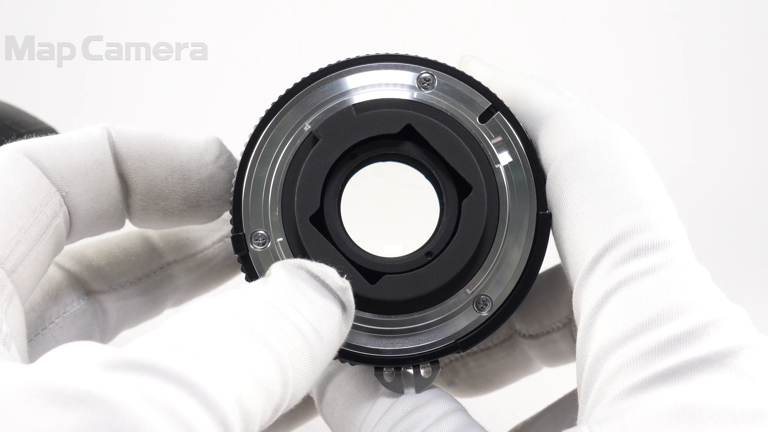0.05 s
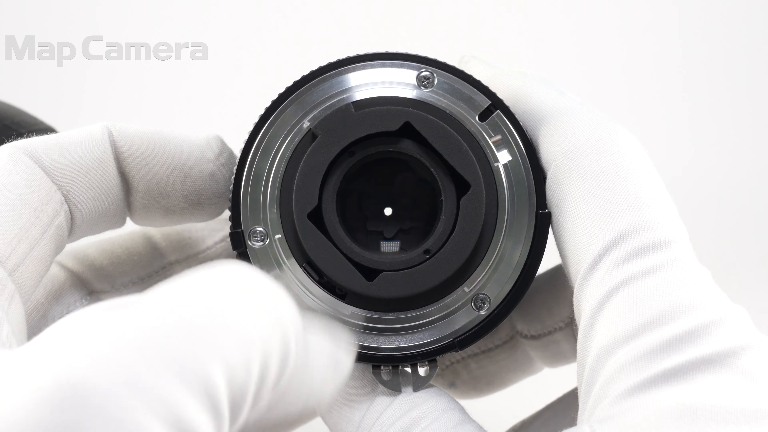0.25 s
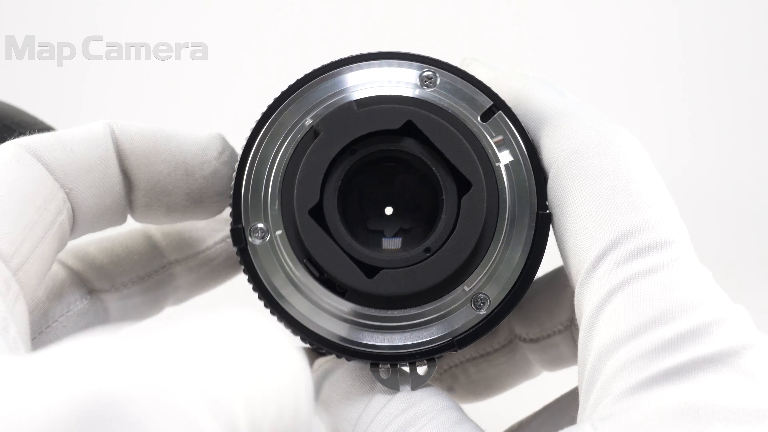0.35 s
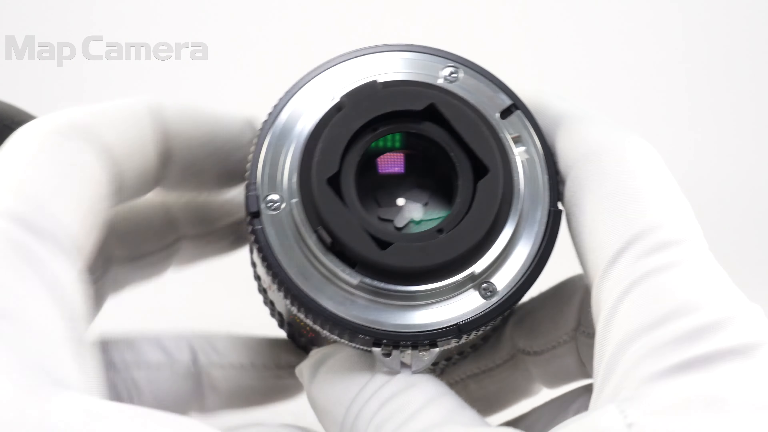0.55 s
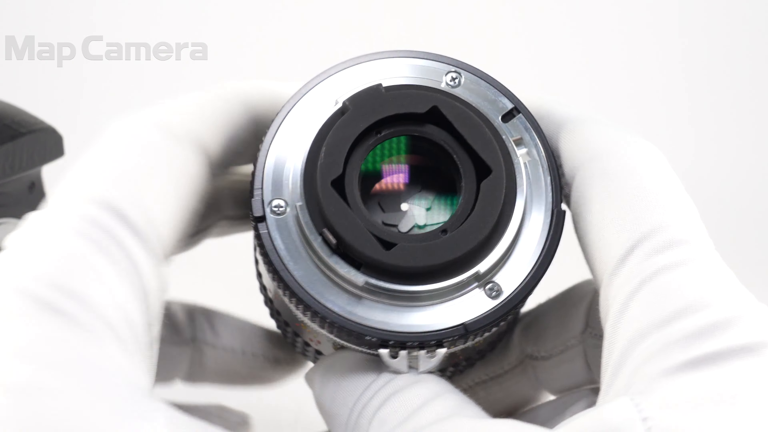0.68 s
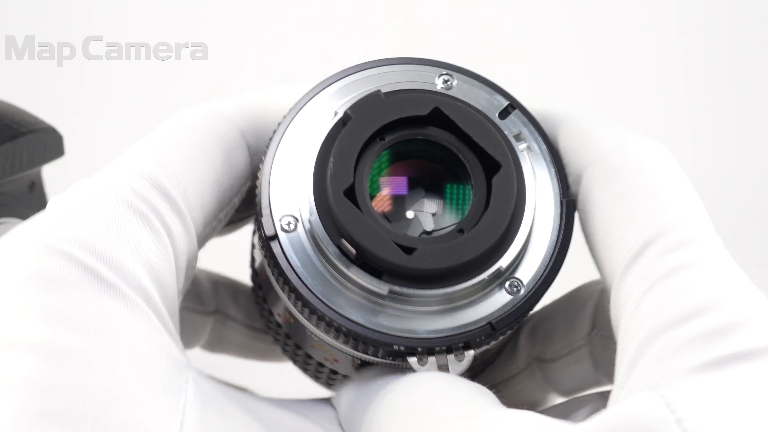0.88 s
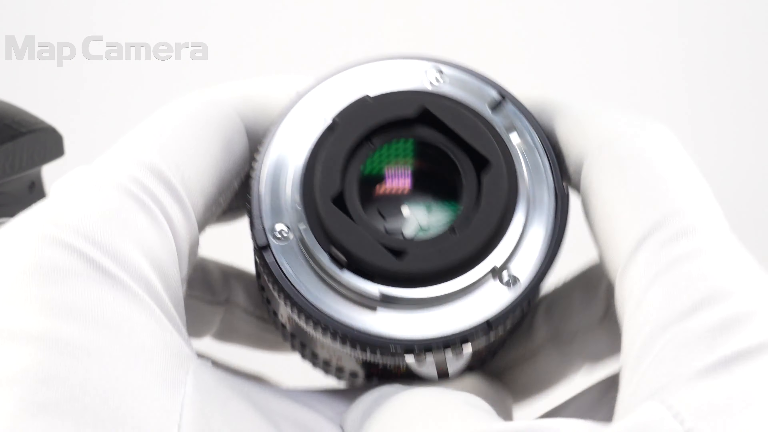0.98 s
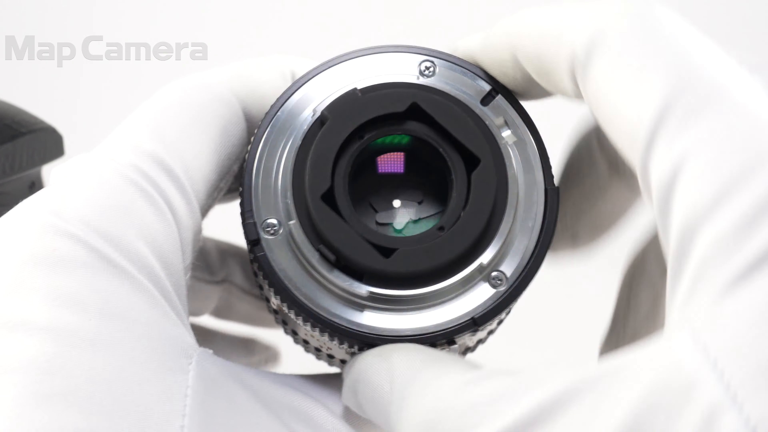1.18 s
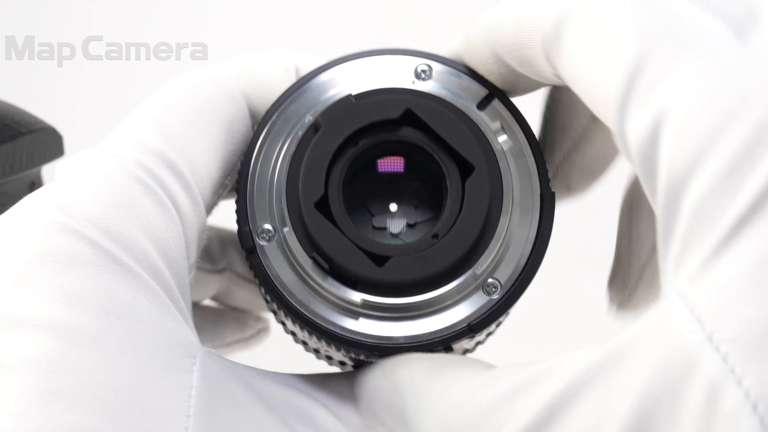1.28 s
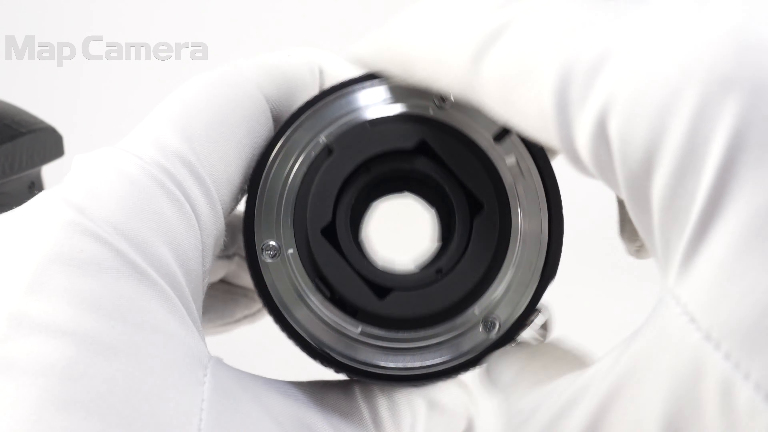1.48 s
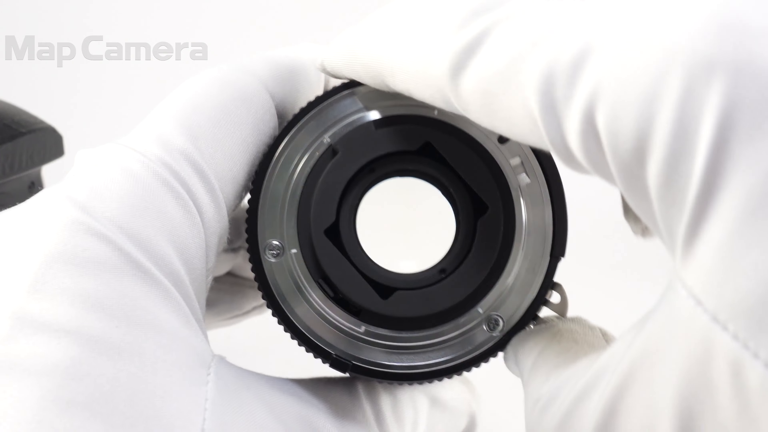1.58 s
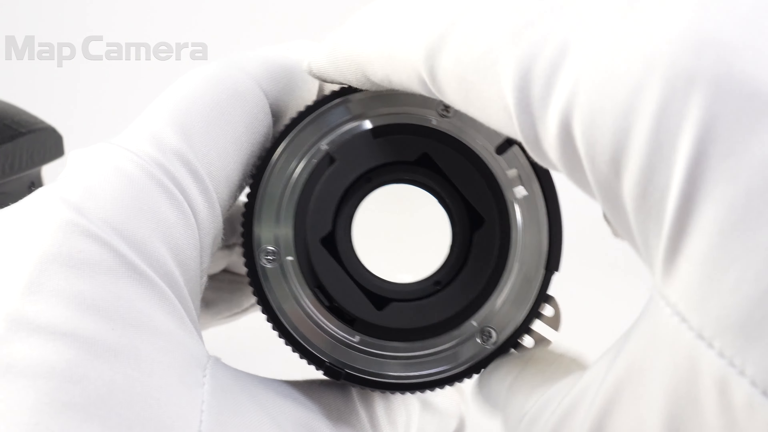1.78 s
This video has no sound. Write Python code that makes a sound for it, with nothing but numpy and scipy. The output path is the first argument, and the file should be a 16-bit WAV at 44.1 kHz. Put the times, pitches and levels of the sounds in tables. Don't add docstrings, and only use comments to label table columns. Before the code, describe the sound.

A camera lens worked by gloved hands: faint lever friction and squeak, a loud bright snap with tiny bounces, soft cloth rubbing, then seven quick ratchet clicks and a hard stop, close microphone, quiet humming room.

```python
import sys
import numpy as np
from scipy import signal
from scipy.fft import rfft, irfft, next_fast_len
from scipy.io import wavfile
from scipy.ndimage import uniform_filter1d

SR = 44100
rng = np.random.default_rng(int(sys.argv[2]) if len(sys.argv) > 2 else 0)


def generate_wav(sig):
    pcm = np.round(np.clip(np.atleast_2d(sig).T, -1, 1) * 32767).astype(np.int16)
    wavfile.write(sys.argv[1], SR, pcm)


def undo_db(level):
    steps = np.asarray(level, float) / 20
    return 10 ** steps


N = 81585

# f/Hz, level/dB
ROOM_SPECTRUM = [(20, -9), (60, -13), (150, -5), (440, -5.5), (1000, -12), (4000, -20.5), (15700, -30.5),
                 (16000, -43)]
# f/Hz, width/Hz, level/dB
DRONE = [(261.7, 30.6, -58.5), (410.6, 72, -62), (333, 39, -79.5), (80.8, 9, -60.5)]
# f/Hz, level/dB
HUM = [(100, -59), (82, -63), (13200, -79)]
# t/s, level/dB
PUSH = [(0, -55), (.035, -59), (.051, -57), (0.052, -48.5), (0.066, -45), (.1, -55.5), (.13, -66),
        (.19, -85), (0.211, -54.5)]
# f/Hz, level/dB
PUSH_SPECTRUM = [(250, -16), (650, 0), (1100, -9), (2500, -9.5), (8000, -15.5), (13000, -24.5),
                 (15700, -30), (16000, -58)]
# f/Hz, width/Hz, level/dB
PUSH_SQUEAK = [(4570, 150, -2), (2670, 290, -7.5), (9100, 300, -24)]
# t/s, level/dB, rise/s, rattle decay/s
LET_GO = [
    (0.2202, -34.5, 0.00019, 0.003),
    (0.2237, -34, 0.0011, 0.0043),
    (0.231, -35.5, 0.0022, 0.003),
    (0.2348, -29.5, .001, 0.00204),
]
# f/Hz, width/Hz, level/dB
LET_GO_BODY = [(2300, 1400, -4), (4670, 1140, 3.5), (6100, 770, 1.5), (10600, 2300, -4.5)]
# f/Hz, level/dB
LET_GO_CRACK = [(800, -36), (1800, 9), (7000, -12), (12000, -7), (13500, -44), (17000, -74)]
# t/s, level/dB, rise/s, rattle decay/s
SNAP = [
    (0.2378, -14.5, 0.0005, 0.0045),
    (0.2405, -5.5, 0.00019, 0.0013),
    (0.243, -8.5, 0.00046, 0.0014),
    (0.2454, -15, 0.000302, 0.0018),
    (0.2491, -22, 0.00038, 0.0016),
    (0.2542, -26.5, .001, 0.0039),
    (0.258, -24.5, 0.0017, 0.004),
    (0.2674, -28.5, 0.0018, 0.0022),
    (0.274, -39, 0.0022, 0.0028),
]
# f/Hz, width/Hz, level/dB
LEVER_BODY = [(1030, 330, -19), (2170, 325, -7.5), (2900, 290, -4), (3723, 500, -1), (4270, 650, 2),
              (5210, 700, 3), (5830, 900, 0.5), (7600, 670, 1), (10940, 2700, -3.5), (11650, 400, -7),
              (14060, 2900, -16.5)]
# f/Hz, level/dB
SNAP_CRACK = [(20, -31), (600, -35), (1500, -32.5), (3000, -11), (15000, 17.5), (16700, -38), (17000, -76)]
# start/s, f/Hz, level/dB, T60/s, muted after/s
SPRING = [(.2412, 9932, -18.5, .1, .035), (.272, 6950, -41.5, .2, .054), (.2412, 8030, -30, .035, .04),
          (.2412, 5378, -28, .035, .04)]
# f/Hz, level/dB, T60/s
LANDING_RING = [(4040, -2, 0.022), (4356, 2, 0.026), (4900, -8, 0.014), (5190, -2, 0.021), (5730, -5, .018),
                (7600, -6, .014), (11000, -7, 0.0104)]
# t/s, length/s, level/dB, f/Hz
PADS = [(0.3, 0.022, -43, 318), (0.51, .03, -54.5, 265), (0.518, 0.044, -43, 280), (.513, 0.028, -49, 820),
        (0.28, 0.068, -54, 450), (1.3, 0.035, -52, 170), (.555, 0.053, -44, 797), (0.592, 0.032, -40, 406),
        (0.942, 0.066, -38.5, 372), (1.3, 0.021, -46, 310), (1.64, 0.095, -52.5, 312)]
# t/s, level/dB, dullness/0-1
RUB = [(0.361, -76, 0.97), (0.411, -51.5, 0.82), (.44, -68, .8), (.508, -80, .9), (0.513, -47.5, 0.8),
       (.6, -44.5, 0.75), (.64, -47.5, 0.43), (.85, -52, 0.03), (0.962, -46, 0.55), (1.03, -54, .3),
       (1.065, -61, .4), (1.12, -57, .05), (1.29, -56, 0.34), (1.36, -55, 0.2), (1.394, -56, .25),
       (1.62, -61.5, 0.9), (1.702, -50.5, 0.66), (1.761, -63, 0.82)]
# f/Hz, level/dB
RUB_BRIGHT = [(300, 1), (1000, -2.5), (3000, 0.5), (6000, -3.5), (12000, -9), (15700, -21), (16000, -45)]
# f/Hz, level/dB
RUB_DULL = [(150, -15), (350, 3), (900, -1.5), (2000, -8), (3500, -23.5), (8000, -30), (15700, -48),
            (16000, -59.5)]
# f/Hz, width/Hz, level/dB
RUB_CHIRPS = [(2780, 610, -16), (3320, 790, -16), (1358, 320, -14)]
# t/s, length/s, level/dB, f/Hz
CATCHES = [(0.517, 0.015, -55, 1710), (.545, .02, -56, 1820), (0.554, .022, -56, 3250),
           (0.567, .014, -53.5, 2680), (.596, .02, -55, 3430), (.597, 0.025, -52, 2300),
           (0.592, 0.019, -56, 680), (0.546, .02, -52, 430), (0.652, 0.063, -58, 2654),
           (0.691, 0.025, -54, 2770), (.74, .04, -60, 3270), (0.785, .02, -55, 1395),
           (.945, 0.041, -49.5, 520), (1.078, .02, -51, 706)]
# t/s, level/dB, slip before drop/s, ring ping/dB, blade hiss/dB
DETENTS = [(1.3874, -13, 0.00035, -2, 1.5), (1.4209, -14.5, 0.00056, 5.5, 5.5),
           (1.449, -15, 0.00043, 3.5, 7), (1.4801, -17, 0.00052, 1, -3), (1.5092, -18.5, .0012, -1.5, 4),
           (1.5406, -17.5, 0.0017, -1, 6), (1.5703, -18, 0.00082, -2, 0)]
# ring level/dB, knock f/Hz, knock level/dB
GRIP = [(-16.5, 940, -24), (-24, 1050, -28.5), (-21, 1020, -25.5), (-22, 1150, -32), (-20.5, 1170, -28),
        (-21.5, 1060, -27), (-22.5, 1000, -30)]
# f/Hz, width/Hz, level/dB
BARREL_BODY = [(2310, 420, -6), (2890, 600, 1), (4100, 1300, -6), (5510, 480, -4), (6590, 1400, -7.5),
               (8670, 670, 0.5), (11230, 1500, -10), (13830, 1200, -5), (15130, 900, -8.5)]
# f/Hz, level/dB, T60/s
BARREL_RING = [(2846, 4, 0.017), (2710, -9.5, 0.054), (2954, -8, .03), (2380, -16.5, 0.055),
               (1967, -14.5, 0.034), (3352, -7, 0.029), (3520, -12, 0.034), (5000, -9.5, 0.03),
               (8200, -12, .015), (9400, -9.5, .015)]
# f/Hz, level/dB
TICK_CRACK = [(300, -49), (800, 11), (3000, 12.5), (15000, -6), (16700, -19.5), (17000, -70)]
# t/s, level/dB, rise/s, rattle decay/s
RING_STOP = [
    (1.5772, -8.5, .0002, 0.00088),
    (1.581, -20.5, 0.000406, 0.0024),
]
# f/Hz, width/Hz, level/dB
STOP_BODY = [(1790, 100, -13.5), (3070, 300, -0.5), (4260, 620, 3.5), (5010, 310, 3), (6490, 250, 0.5),
             (9000, 1900, 1.5), (11000, 520, -4.5), (11800, 880, -2.5), (15000, 670, -12.5)]
# f/Hz, level/dB, T60/s
STOP_RING = [(1770, -8, 0.02), (2778, -13, 0.084), (4160, -5.5, 0.042), (4660, -4.5, 0.041),
             (5100, -14, 0.13), (6960, 0.5, 0.019), (7634, -9, 0.032)]
# f/Hz, level/dB
WIDTH = [(100, -52), (4000, -38), (6000, -24.5), (11000, -24.5), (13000, -12), (16000, -24)]
# f/Hz, level/dB
SNAP_WIDTH = [(100, -44), (4000, -40), (5500, -13), (12000, -8), (16000, -10)]

LONGEST_RING_S = 0.04


def evened(x):
    return x / np.sqrt(np.mean(x ** 2) + 1e-20)


def colour(x, points):
    size = next_fast_len(len(x) + 512)
    f_hz, db = np.transpose(points)
    bins_hz = np.fft.rfftfreq(size, 1 / SR)
    gain_db = np.interp(np.log(bins_hz + 1), np.log(f_hz + 1), db)
    return irfft(rfft(x, size) * undo_db(gain_db), size)[:len(x)]


def resonate(x, hz, width_hz):
    r = np.exp(-np.pi * width_hz / SR)
    return signal.lfilter([1 - r, 0, r - 1], [1, -2 * r * np.cos(2 * np.pi * hz / SR), r * r], x)


def add(mix, start_s, sound):
    part = mix[max(round(start_s * SR), 0):][:len(sound)]
    part += sound[:len(part)]


def gritty(size, grit_db, count):
    wander = evened(uniform_filter1d(rng.standard_normal(size), count))
    return rng.standard_normal(size) * undo_db(grit_db * wander)


def strike(mix, s, db, rise_s, fall_s, body, crack, crack_db, tail_db, tail_s, tail_hz, contact=1.4):
    t = np.arange(4400) / SR
    lead_s = 4 * rise_s
    contacts = gritty(len(t), 1.5, count=10)
    growth = np.exp(np.minimum(t - lead_s, 0) / rise_s)
    push = contacts * np.where(t < lead_s, growth, np.exp((lead_s - t) / fall_s))
    pole = np.exp(-2 * np.pi * tail_hz / SR)
    loose = signal.lfilter([1 - pole], [1, -pole], contacts)
    push = push + loose * undo_db(tail_db) * np.exp((lead_s - t) / tail_s) * (t >= lead_s)
    push = push + contact * (np.arange(len(t)) == round(lead_s * SR))
    sound = undo_db(crack_db) * evened(colour(push, crack))
    for k, (hz, width_hz, mode_db) in enumerate(body):
        sound = sound + (-1) ** k * undo_db(mode_db) * evened(resonate(push, hz, width_hz))
    energy = np.sqrt(SR * (rise_s + fall_s) / 2)
    add(mix, s - lead_s, undo_db(db) * sound * energy / np.linalg.norm(sound))


def ring(mix, s, db, rise_s, modes):
    t = np.arange(4400) / SR
    tones = sum(undo_db(mode_db - 60 * t / t60_s) * np.sin(2 * np.pi * hz * t) for hz, mode_db, t60_s in modes)
    add(mix, s, undo_db(db) * (1 - np.exp(-t / rise_s)) * tones)


def thump(mix, s, length_s, db, hz):
    t = np.arange(4000) / SR
    noise = resonate(resonate(rng.standard_normal(6000), hz, 100), hz, 100)
    tone_share = 0.6
    tone = tone_share * np.sqrt(2) * np.sin(2 * np.pi * hz * t)
    sound = (1 - tone_share) * evened(noise[2000:]) + tone
    u = np.linspace(0, 1, 2000)
    hump = np.interp(t / length_s, u, np.sin(np.pi * u ** 0.44), 0, 0)
    add(mix, s, undo_db(db) * sound * hump)


def room_tone():
    t = np.arange(N) / SR
    out = undo_db(-56) * evened(colour(rng.standard_normal(N), ROOM_SPECTRUM))
    noise = rng.standard_normal(N)
    for hz, width_hz, db in DRONE:
        out = out + undo_db(db) * evened(resonate(resonate(noise, hz, width_hz), hz, width_hz))
    for hz, db in HUM:
        out = out + undo_db(db) * np.sqrt(2) * np.sin(2 * np.pi * (hz * t + rng.random()))
    return out


def lever_push():
    t = np.arange(N) / SR
    push_s, push_db = np.transpose(PUSH)
    db = np.interp(t, push_s, push_db, -99, -99)
    slips = gritty(N, 1.1, count=60)
    squeak = sum(undo_db(d) * evened(resonate(slips, hz, width_hz)) for hz, width_hz, d in PUSH_SQUEAK)
    squeak = squeak * undo_db(0.05 * (db - db.max()))
    squeak = squeak * (t > 0.046) * (t < 0.16)
    return undo_db(db) * (evened(colour(slips, PUSH_SPECTRUM)) + squeak)


def lever_snap():
    out = np.zeros(N)
    for row in LET_GO:
        strike(out, *row, LET_GO_BODY, LET_GO_CRACK, crack_db=-5.0, tail_db=-28.0, tail_s=0.01, tail_hz=9000)
    for row in SNAP:
        contact = 2.5 * (row[0] < 0.248)
        strike(out, *row, LEVER_BODY, SNAP_CRACK, crack_db=-4.0, tail_db=-30.5, tail_s=0.021,
               tail_hz=9000, contact=contact)
    t = np.arange(9000) / SR
    mute_db_per_s = -2500
    for s, hz, db, t60_s, muted_s in SPRING:
        waver_db = 2.1 * evened(uniform_filter1d(rng.standard_normal(len(t)), size=150))
        fade_db = waver_db + db - 60 * t / t60_s + mute_db_per_s * np.maximum(t - muted_s, 0)
        add(out, s, undo_db(fade_db) * (1 - np.exp(-t * 700)) * np.sin(2 * np.pi * hz * t))
    ring(out, 0.2404, -14, 0.00014, LANDING_RING)
    thump_width_s = 0.00048
    add(out, 0.2411, undo_db(-30) * np.exp(-(t / thump_width_s - 3) ** 2))
    return out


def finger_pads():
    out = np.zeros(N)
    for row in PADS:
        thump(out, *row)
    return out


def rubbing():
    t = np.arange(N) / SR
    rub_s, rub_db, rub_dull = np.transpose(RUB)
    dull = np.interp(t, rub_s, rub_dull)
    bright_rub = evened(colour(gritty(N, 1.0, count=500), RUB_BRIGHT))
    dull_rub = evened(colour(gritty(N, 0.52, count=300), RUB_DULL))
    sound = (1 - dull) * bright_rub + dull * dull_rub
    for hz, width_hz, db in RUB_CHIRPS:
        sound = sound + undo_db(db) * evened(resonate(gritty(N, 5.5, count=900), hz, width_hz))
    return sound * undo_db(np.interp(t, rub_s, rub_db, -99, -99))


def thread_catches():
    out = np.zeros(N)
    for row in CATCHES:
        thump(out, *row)
    return out


def detent_body(ping_db, hiss_db):
    body = []
    for hz, width_hz, db in BARREL_BODY:
        extra_db = hiss_db if hz > 12500 else ping_db if hz > 6000 else 0
        body.append((hz, width_hz, db + extra_db))
    return body


def aperture_ring():
    out = np.zeros(N)
    for (s, db, slip_s, ping_db, hiss_db), (ring_db, knock_hz, knock_db) in zip(DETENTS, GRIP):
        strike(out, s, db - 3.5, slip_s, 0.0022, detent_body(ping_db, hiss_db), TICK_CRACK,
               crack_db=-3.5, tail_db=-9.5, tail_s=0.011, tail_hz=5000)
        modes = []
        for hz, mode_db, t60_s in BARREL_RING:
            detune, lift = rng.standard_normal(2)
            modes.append((hz * (1 + 0.015 * detune), mode_db + 3 * lift, min(t60_s, LONGEST_RING_S)))
        ring(out, s - slip_s, ring_db, 1.53 * slip_s, modes)
        ring(out, s - slip_s, knock_db, 0.00037, [(knock_hz, 0, 0.014)])
    for row in RING_STOP:
        strike(out, *row, STOP_BODY, TICK_CRACK, crack_db=-4.5, tail_db=-12.0, tail_s=0.006, tail_hz=9000)
    modes = [(hz, db, min(t60_s, LONGEST_RING_S)) for hz, db, t60_s in STOP_RING]
    ring(out, 1.5771, -20.5, 0.00018, modes)
    return out


def table_reflections(hits):
    t = np.arange(8000) / SR
    t60_s, onset_s = 0.063, 0.0045
    tail = rng.standard_normal(8000) * undo_db(-60 * t / t60_s) * np.minimum(t / onset_s, 1)
    return undo_db(-16) * signal.fftconvolve(hits, tail / np.linalg.norm(tail))[:N]


def scene():
    snap = lever_snap()
    hits = snap + aperture_ring()
    mid = hits + table_reflections(hits)
    mid = mid + room_tone() + lever_push() + finger_pads() + rubbing() + thread_catches()
    scatter = evened(uniform_filter1d(rng.standard_normal(N), size=16))
    side = colour(mid * scatter, WIDTH) + colour(snap * scatter, SNAP_WIDTH)
    return np.array([mid + side, mid - side])


def roll_off(x):
    return signal.sosfilt(signal.butter(12, 16800, fs=SR, output="sos"), x)


def record(dry):
    lowpass = signal.firwin(255, 16750, window=("kaiser", 9), fs=SR)
    band = signal.oaconvolve(dry, lowpass[None], "same")
    return roll_off(np.clip(band, -1, 1))


dry = scene()
out = record(dry)
generate_wav(out)
```